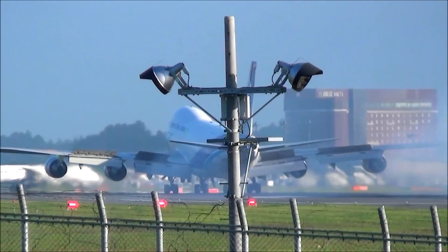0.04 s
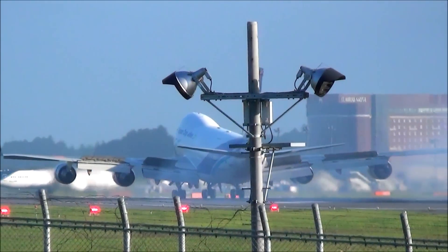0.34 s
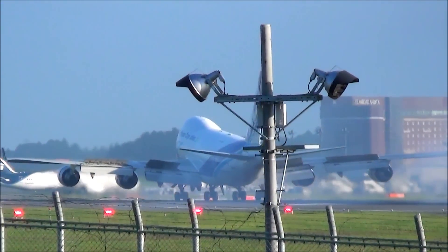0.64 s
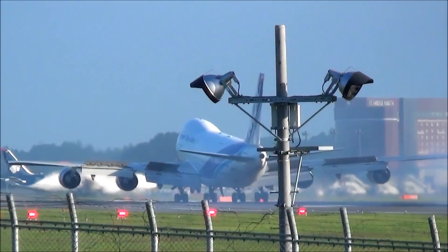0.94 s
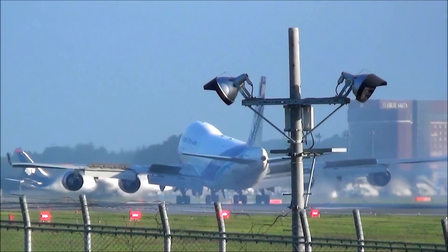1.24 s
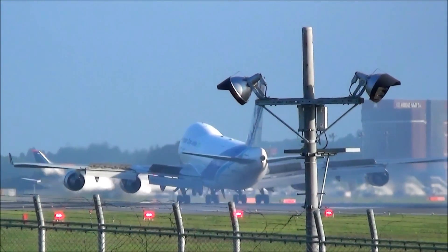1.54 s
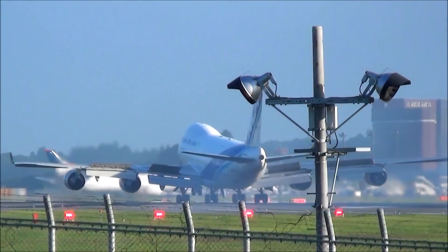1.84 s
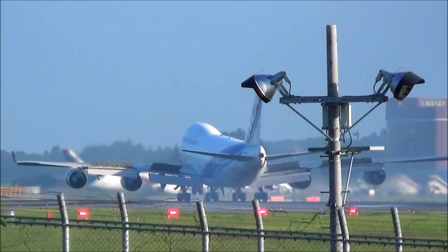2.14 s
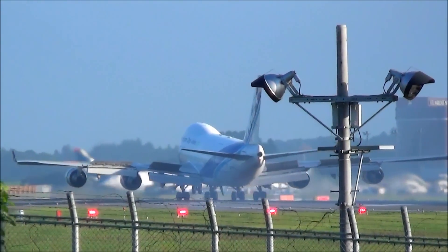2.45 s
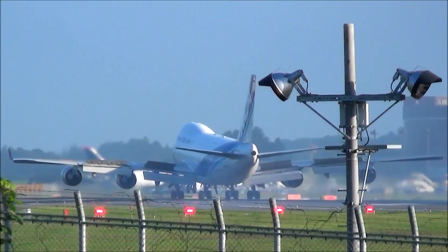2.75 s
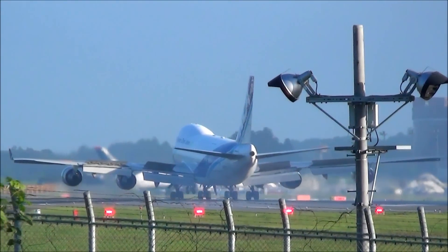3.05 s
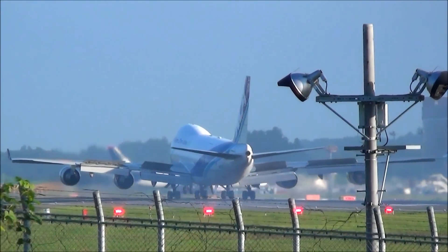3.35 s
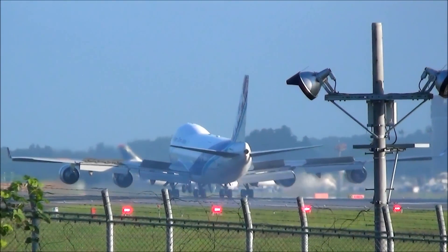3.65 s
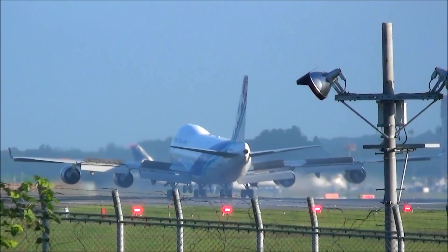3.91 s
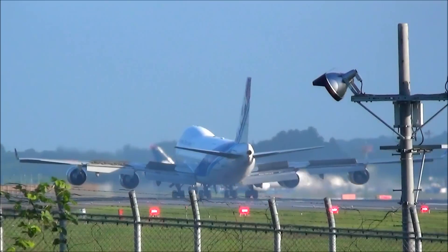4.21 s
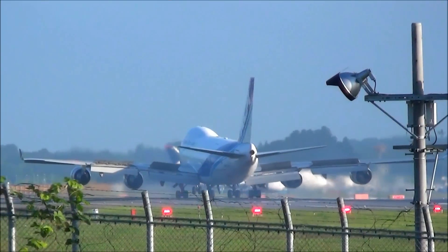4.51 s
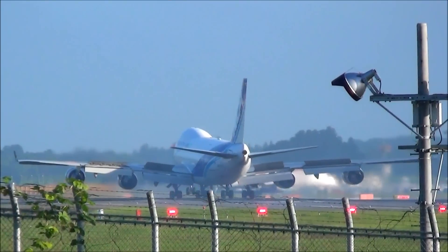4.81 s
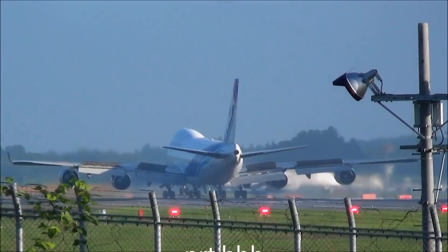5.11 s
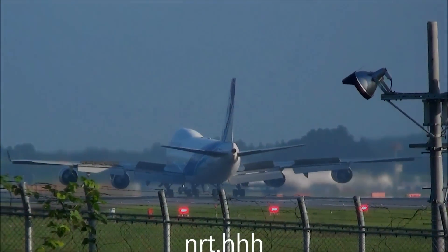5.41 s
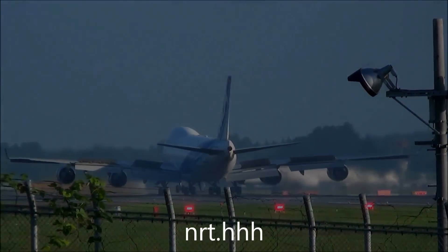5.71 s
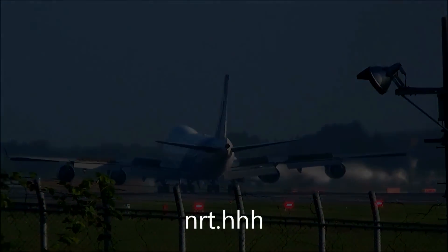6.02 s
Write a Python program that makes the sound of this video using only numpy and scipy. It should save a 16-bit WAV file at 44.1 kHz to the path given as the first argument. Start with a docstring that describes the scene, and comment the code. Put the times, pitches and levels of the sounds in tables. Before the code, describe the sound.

A large jet rolls away after landing, its deep roar and low boom carrying across an open, grassy airfield. The rumble wavers in the air, surges briefly a few times and eases slightly near the end. A blurred engine whine rides above it, strongest about two seconds in. Much quieter but nearer the microphone, cicadas shrill steadily, other insects tick and buzz, and small birds give short whistles.

```python
"""A distant roar and boom: the exhaust of a four-engined jet freighter rolling out after landing,
heard across the grass of an airfield. Gusty air modulates the roar and broadens the blade tones
of the fans into a blurred whine near 1 kHz. Closer by, cicadas shrill, other summer insects
tick and buzz, and a few small birds call faintly, their whistles scattered by the trees."""
import sys
import numpy as np
from scipy import signal
from scipy.fft import rfft, irfft
from scipy.io import wavfile
from scipy.ndimage import uniform_filter1d, minimum_filter1d

SR = 44100
rng = np.random.default_rng(int(sys.argv[2]) if len(sys.argv) > 2 else 0)


def dump(signal):
    """Clip the signal to [-1, 1] and save it as 16-bit WAV at the path in sys.argv[1]."""
    limited = np.clip(np.atleast_2d(signal).T, -1, 1)
    pcm = np.round(limited * 32767).astype(np.int16)
    wavfile.write(sys.argv[1], SR, pcm)


N = 267598
T = np.arange(N) / SR
HZ = np.maximum(np.fft.rfftfreq(N, 1 / SR), 1)

# Spectral shape within the exhaust bands: frequency_hz, relative_db
EXHAUST_SPECTRUM = [(20, -9), (50, -7.5), (100, -4), (150, -1.54), (180, 0), (260, -6), (330, -6.5),
                    (430, -10.5), (580, -17.5), (730, -19.5), (880, -27), (1380, -30.5), (1900, -37.5),
                    (3000, -52)]
# Exhaust bands and how far each follows the jet, the fans and the surges:
# low_hz, high_hz, level_db, jet_share, fan_share, surge_share, flutter_db
EDDY_BANDS = [(45.5, 133, -19.5, .1, 0.038, 0.16, 1.03), (135.6, 245.5, -17.5, 0.92, 0.09, 0.94, 1.43),
              (261.5, 549, -21, 0.81, 0.062, .1, 0.3), (621, 2360, -31, 0.92, 0.11, .15, 0.32)]
# Jet noise, wavering at first and then slowly fading as the aircraft rolls away: time_s, relative_db
JET_ENVELOPE = [(0, -13.5), (.45, -15), (.8, -13.0), (1.3, -13.0), (1.55, -14), (2.1, -13), (3.4, -15),
                (4.75, -15), (5.35, -17.5), (6.07, -17)]
# Brief surges of the roar: centre_s, rise_db
ROAR_SURGES = [(1.27, 3.5), (2.25, 2.5), (3.74, 4), (4.75, 4.5)]
# Deepest boom of the exhaust: time_s, level_db
BOOM_ENVELOPE = [(0, -34), (.7, -29), (1.3, -20.5), (1.6, -29), (2.7, -21), (3.15, -23), (3.8, -18),
                 (4.1, -25), (4.5, -20), (6.07, -26)]
# Fan whine carried over the field: time_s, level_db
WHINE_ENVELOPE = [(0, -34.5), (.34, -33), (.45, -37), (1.77, -39), (1.88, -26.5), (2.2, -28.5), (2.4, -34),
                  (3.35, -33), (3.7, -37), (4.2, -33), (4.9, -35.5), (5.28, -36.5), (5.45, -39),
                  (6.07, -37)]
# Bird whistles: centre_s, level_db, length_s, first_hz, last_hz
BIRD_WHISTLES = [(.11, -46, 0.07, 2250, 1980), (0.578, -47.5, 0.085, 2290, 2120),
                 (1.88, -40, 0.066, 2730, 2604), (1.972, -47, 0.11, 2520, 2400),
                 (2.146, -49, 0.12, 2580, 2640), (2.915, -53, 0.085, 2470, 2500),
                 (3.363, -49, 0.13, 2440, 2530), (4.078, -39.5, 0.07, 2480, 2690),
                 (4.19, -44.5, 0.061, 2600, 2810), (4.294, -45.5, 0.059, 2700, 2980),
                 (4.393, -46, 0.085, 2580, 2720), (5.636, -40.5, 0.046, 2340, 2760),
                 (5.68, -40, 0.027, 2600, 1900), (1.597, -58, 0.84, 3305, 3290),
                 (3.25, -59.5, 0.58, 3310, 3300), (5.79, -56, 0.39, 3650, 3520)]
# Runs of insect ticks: start_s, length_s, interval_s, first_db, last_db, first_hz, last_hz
TICK_TRAINS = [(0.174, .435, .087, -46, -41.5, 6750, 6550), (1.127, .219, .0438, -52, -44.5, 6250, 6800),
               (2.21, 0.29, .0435, -52, -47, 6050, 6750)]
# Soft sizzles: centre_s, level_db, length_s, pitch_hz
SIZZLE_BURSTS = [(4.19, -56, .16, 6350), (4.31, -56, .5, 5400)]
# Spectrum of the cicada chorus: frequency_hz, relative_db
CICADA_SPECTRUM = [(3300, -50), (3800, -11), (4100, -2.5), (4400, 0), (4650, -1.5), (4900, -10.5),
                   (5200, -26), (6000, -56)]
# Spectrum of the field's hiss: frequency_hz, relative_db
HISS_SPECTRUM = [(1200, -12), (2000, 7), (2350, 9), (2630, 10.5), (2930, 1.5), (3200, 4), (3700, -2.5),
                 (5200, -2.5), (6500, -3.5), (8300, -4.5), (8800, -7), (10200, -8.5)]
# Rise and fall of that hiss: time_s, relative_db
HISS_ENVELOPE = [(0, -49.5), (1.5, -51), (3.0, -50.5), (3.7, -50.5), (4.1, -48), (4.93, -47.8), (5.0, -52),
                 (6.07, -50.8)]
# Likeness of left and right for far sound: frequency_hz, coherence
COHERENCE = [(35, 0.9), (70, 1), (130, 0.87), (200, 0.95), (400, 1), (590, 0.76), (750, 0.98), (880, 0.39),
             (1040, 1), (1600, 1), (2400, 0.25), (3100, .15), (4400, 0.42), (9000, 0.089)]
# Level difference for far sound: frequency_hz, left_minus_right_db
LEVEL_DIFFERENCE = [(30, 1), (60, -4), (110, -6), (190, -0.5), (265, 1), (340, -1), (480, -2.5),
                    (600, -1.5), (800, -2.5), (950, 0), (1400, -1.3), (2500, -4.5), (4500, -2.5),
                    (5500, -.5)]
# Phase difference for far sound: frequency_hz, left_lead_rad
PHASE_DIFFERENCE = [(40, -1.5), (65, -0.6), (130, 0), (235, 0.52), (290, 0.27), (560, 0.4), (850, 0.6),
                    (950, 0), (1200, 0.7), (2000, 0.66), (2800, -1), (3500, 2.1), (4300, 1.15), (7000, 3)]


def exhaust(surge_s=.18):
    """Turbulent mixing noise: each size of eddy fills a band that flutters alone, over a coherent boom."""
    spectrum = from_db(at_hz(EXHAUST_SPECTRUM))
    jet_db, fans_db = swing(JET_ENVELOPE), swing(WHINE_ENVELOPE)
    surge_db = sum(db * swell(at, surge_s) for at, db in ROAR_SURGES)
    boom = panned(mono_noise(resonance(32.5, 17) ** 2), pan_db=-2.8)
    roar = at_level(boom, in_time(BOOM_ENVELOPE), window=13001)
    for low_hz, high_hz, db, jet_share, fan_share, surge_share, flutter_db in EDDY_BANDS:
        level_db = db + jet_share * jet_db + fan_share * fans_db + surge_share * surge_db
        level_db += flutter_db * flutter()
        roar += at_level(far_noise(spectrum * high_pass(low_hz) * low_pass(high_hz)), level_db)
    return roar


def fans(core_hz=68, skirt_db=-10, flutter_db=1.7):
    """Spectral broadening: turbulent air smears four fans' blade tones into a narrow band with skirts."""
    core = resonance(1044.7, core_hz) ** 2
    skirt = from_db(skirt_db) * resonance(1047, 160) ** 2
    whine = far_noise(np.hypot(core, skirt))
    return at_level(whine, in_time(WHINE_ENVELOPE) + flutter_db * flutter())


def birds(waver_hz=75, echo_db=-7, t60_s=.62):
    """Frequency modulation: whistles glide and waver; scattering by the trees adds reverberation."""
    waver = waver_hz * mono_noise(low_pass(70, order=2))
    song = np.zeros(N)
    for at, db, length, first_hz, last_hz in BIRD_WHISTLES:
        pitch_hz = np.interp(T, [at - length / 2, at + length / 2], [first_hz, last_hz]) + waver
        phase = 2 * np.pi * np.cumsum(pitch_hz) / SR
        song += from_db(db) * swell(at, length) * np.sqrt(2) * np.sin(phase)
    scatter = rng.standard_normal((2, SR)) * from_db(-60 * T[:SR] / t60_s)
    scatter /= np.linalg.norm(scatter, axis=1, keepdims=True)
    echoes = signal.fftconvolve(song[None], scatter, axes=1)[:, :N]
    return panned(song + from_db(echo_db) * echoes, pan_db=-8.5)


def insect_ticks(tick_s=.039, rasp_hz=700, fall_hz_per_s=25000, left_lead_s=.00006):
    """Noise modulation spreads each falling tone into a rasp; the ticks come in even, growing runs."""
    rasp = mono_noise(low_pass(rasp_hz, order=2))
    ticks = np.zeros((2, N))
    for start, length, interval, first_db, last_db, first_hz, last_hz in TICK_TRAINS:
        first, last = (start, first_db, first_hz), (start + length, last_db, last_hz)
        for at, db, hz in np.linspace(first, last, round(length / interval) + 1):
            age = T - at + np.array([[left_lead_s], [0]])
            carrier = np.sqrt(2) * np.cos(2 * np.pi * age * (hz - fall_hz_per_s * age / 2))
            ticks += from_db(db) * swell(at, tick_s) * rasp * carrier
    return ticks


def bush_cricket(first_s=.83, every_s=.825, buzz_s=.2, strokes_per_s=15, level_db=-57.5):
    """Stridulation: two or three wing strokes make each high, evenly paced buzz on the right."""
    strokes = sum(swell(at, buzz_s) * np.abs(np.cos(np.pi * strokes_per_s * (T - at)))
                  for at in np.arange(first_s, T[-1], every_s))
    wing = mono_noise(resonance(8450, 800) ** 2 * high_pass(8100, order=20))
    return panned(from_db(level_db) * strokes * wing, pan_db=-7)


def sizzles(width_hz=1060):
    """Band-limited noise swells into two soft, high sizzles on the left."""
    bursts = sum(from_db(db) * swell(at, length) * mono_noise(resonance(hz, width_hz) ** 2)
                 for at, db, length, hz in SIZZLE_BURSTS)
    return panned(bursts, pan_db=7)


def cicadas(mean_db=-49, hiss_share=.7, flutter_db=.5):
    """Incoherent summation: a chorus in the trees merges into one shrill band that swells with the hiss."""
    level_db = mean_db + hiss_share * swing(HISS_ENVELOPE) + flutter_db * flutter()
    return from_db(level_db) * far_noise(from_db(at_hz(CICADA_SPECTRUM)))


def field_hiss(lift_db=6):
    """Broadband background noise: a thin hiss that swells for about a second."""
    return from_db(in_time(HISS_ENVELOPE) + lift_db) * far_noise(from_db(at_hz(HISS_SPECTRUM)))


def flutter(slowest_hz=2.15, fastest_hz=11.6):
    """Scintillation: the random wavering that turbulent air gives far sound, rms 1."""
    return mono_noise(low_pass(fastest_hz, order=3) * high_pass(slowest_hz, order=2))


def far_noise(gain):
    """Partial coherence: far noise differs left and right in waveform, level and phase; mid rms 1."""
    mid, side = rfft(rng.standard_normal((2, N))) * gain
    coherence = np.clip(at_hz(COHERENCE), 0, .995)
    sign = np.array([[1], [-1]])
    pair = np.sqrt(1 + coherence) * mid + sign * np.sqrt(1 - coherence) * side
    balance = from_db(sign * at_hz(LEVEL_DIFFERENCE) / 2)
    phase_shift = np.exp(.5j * sign * at_hz(PHASE_DIFFERENCE))
    noise = irfft(pair * balance * phase_shift, N)
    return noise / noise.mean(axis=0).std()


def mono_noise(gain):
    """Spectral shaping of white noise, rms 1."""
    noise = irfft(rfft(rng.standard_normal(N)) * gain, N)
    return noise / noise.std()


def at_level(noise, level_db, window=7001):
    """Division by the running rms evens out the noise's own swells; it then follows level_db."""
    power = uniform_filter1d(uniform_filter1d(noise.mean(axis=0) ** 2, window), window // 2)
    return noise / np.sqrt(power) * from_db(level_db)


def panned(x, pan_db):
    """A level difference places a source left (+) or right (-)."""
    return x * from_db(np.array([[pan_db], [-pan_db]]) / 2)


def resonance(hz, width_hz):
    """Gain of a damped resonator, 1 at its peak."""
    return 1 / np.sqrt(1 + ((HZ ** 2 - hz ** 2) / (HZ * width_hz)) ** 2)


def low_pass(hz, order=8):
    """Gain of a maximally flat low-pass."""
    return 1 / np.sqrt(1 + (HZ / hz) ** (2 * order))


def high_pass(hz, order=8):
    """Gain of a maximally flat high-pass."""
    return 1 / np.sqrt(1 + (hz / HZ) ** (2 * order))


def swell(centre_s, length_s):
    """A half-cosine envelope."""
    return np.cos(np.pi * np.clip((T - centre_s) / length_s, -.5, .5))


def swing(envelope):
    """Deviation of a level from its mean, in dB."""
    db = in_time(envelope)
    return db - db.mean()


def in_time(rows):
    """A table interpolated over time."""
    return np.interp(T, *np.transpose(rows))


def at_hz(rows):
    """A table interpolated over log frequency."""
    hz, value = np.transpose(rows)
    return np.interp(np.log(HZ), np.log(hz), value)


def from_db(db):
    """Decibels to amplitude ratio."""
    return 10 ** (np.asarray(db) / 20)


def scene():
    """Superposition of the far aircraft and the near field."""
    aircraft = exhaust() + fans()
    return aircraft + cicadas() + field_hiss() + insect_ticks() + sizzles() + bush_cricket() + birds()


def record(dry, ceiling=.97, fade_s=.003, cutoff_hz=10150):
    """Smooth limiting holds down the rare highest peaks; the ends fade and the top is cut steeply."""
    allowed = np.minimum(1, ceiling / (np.abs(dry).max(axis=0) + 1e-9))
    gain = uniform_filter1d(minimum_filter1d(allowed, size=401), size=401)
    fade = np.minimum(1, np.minimum(T, T[-1] - T) / fade_s)
    treble_cut = signal.ellip(14, .05, 80, cutoff_hz, fs=SR, output="sos")
    return signal.sosfilt(treble_cut, dry * gain * fade)


dry = scene()
out = record(dry)
dump(out)
```